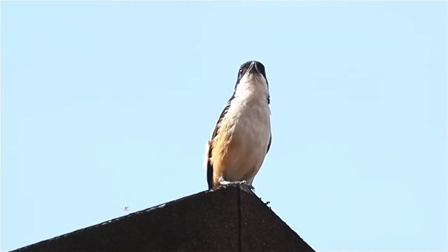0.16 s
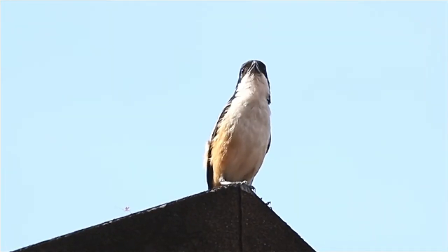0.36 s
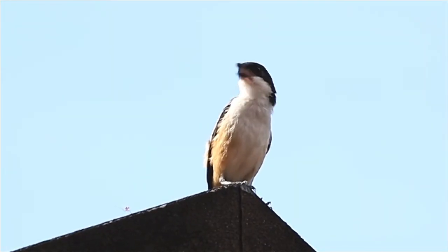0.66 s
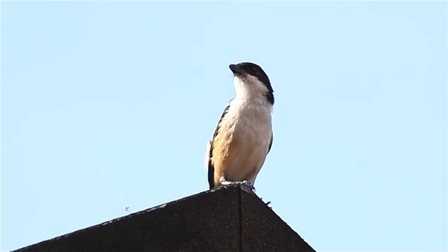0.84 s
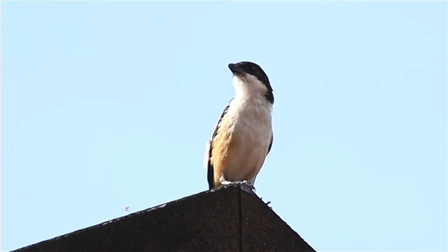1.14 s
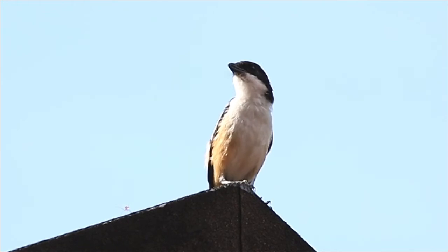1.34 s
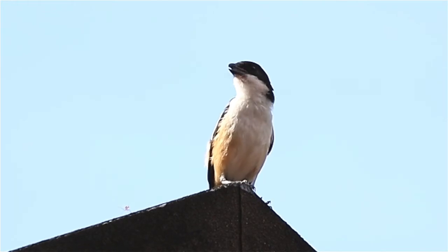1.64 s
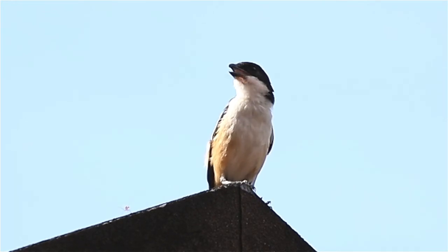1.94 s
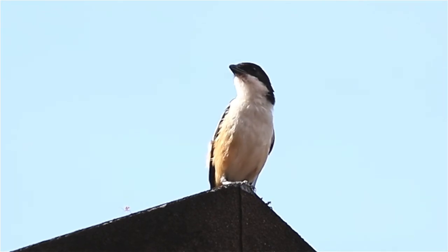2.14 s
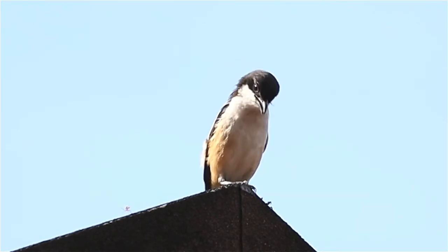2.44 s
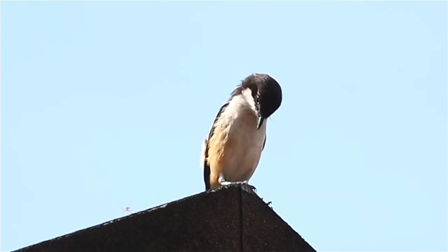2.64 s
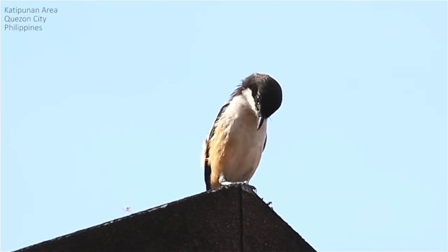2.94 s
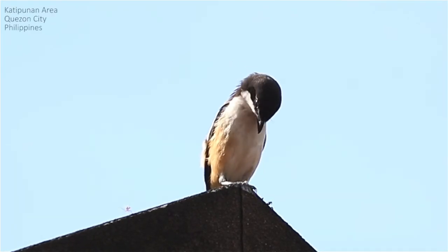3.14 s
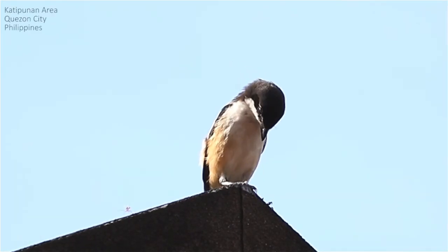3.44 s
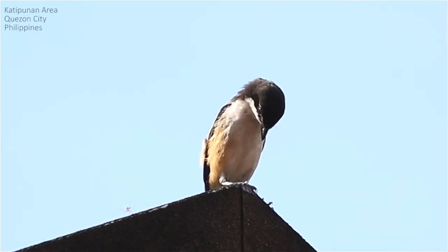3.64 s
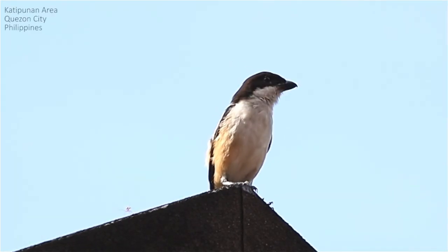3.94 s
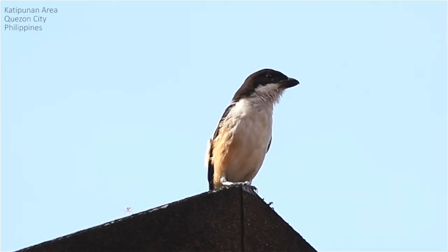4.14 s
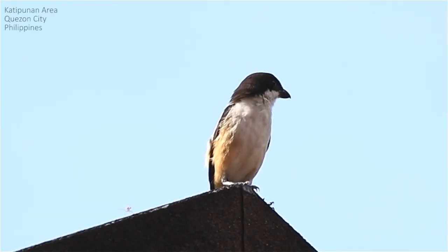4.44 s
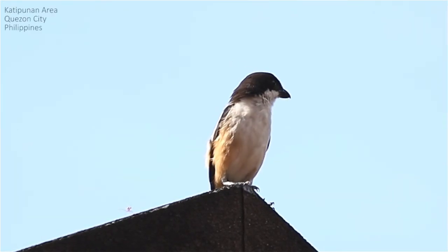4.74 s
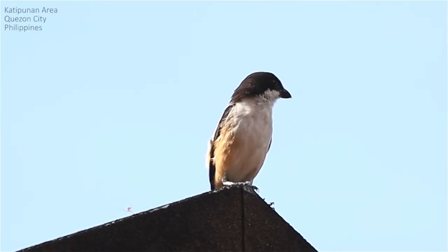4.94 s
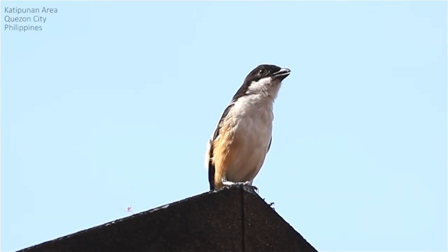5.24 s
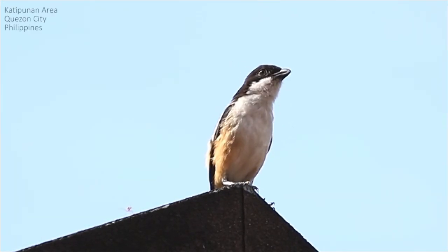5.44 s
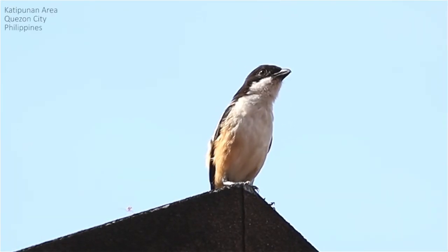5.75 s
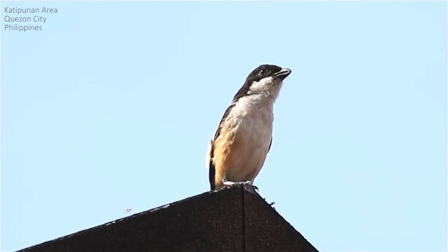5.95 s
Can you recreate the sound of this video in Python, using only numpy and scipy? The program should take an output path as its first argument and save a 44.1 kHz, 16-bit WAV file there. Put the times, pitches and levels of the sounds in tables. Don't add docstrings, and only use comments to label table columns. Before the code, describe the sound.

Outdoors among houses, distant hoarse bird chatter and small chirps lead to three loud, grating calls from one nearby bird. A quieter gap follows with one weak rasp, then other birds' brief whistles and quick falling sweeps, a faint hoarse rooster far off, and two shorter closing rasps. Soft traffic rumble, a fine insect shimmer and microphone hiss continue throughout; noise reduction makes the middle band unnaturally empty between calls.

```python
import sys
import numpy as np
from scipy import signal
from scipy.fft import rfft, irfft, next_fast_len
from scipy.io import wavfile
from scipy.ndimage import uniform_filter1d, map_coordinates

SR = 44100
rng = np.random.default_rng(int(sys.argv[2]) if len(sys.argv) > 2 else 0)


def put_to_file(sound):
    columns = np.atleast_2d(sound).T
    safe = np.clip(columns, -1, 1)
    whole_steps = np.round(safe * 32767)
    wavfile.write(sys.argv[1], SR, whole_steps.astype(np.int16))


def how_loud(loudness_db):
    steps = np.asarray(loudness_db, float) / 20
    return 10 ** steps


N = 268569
EAR_TILT = how_loud([[.6], [-.6]])


def unit(x):
    return x / np.sqrt(np.mean(np.abs(x) ** 2) + 1e-20)


def along(points, hz):
    f, v = np.transpose(points)
    return np.interp(np.log(hz + 1), np.log(f + 1), v)


def curves(rows, t):
    s, *columns = np.transpose(rows)
    return [np.interp(t, s, column) for column in columns]


def wobble(rate, count):
    knots = rng.standard_normal(int(count * rate / SR) + 4)
    return map_coordinates(knots, [np.arange(count) * rate / SR])


def add(out, start_s, x):
    part = out[..., round(start_s * SR):][..., :x.shape[-1]]
    part += x[..., :part.shape[-1]]


def tone(hz, rough, smear_hz):
    rough = np.clip(rough, 0, 1)
    fuzz = unit(wobble(smear_hz, len(hz)) + 1j * wobble(smear_hz, len(hz)))
    turn = np.exp(2j * np.pi * (np.cumsum(hz) / SR + rng.random()))
    return np.sqrt(2) * np.imag((np.sqrt(1 - rough) + np.sqrt(rough) * fuzz) * turn)


def glides(notes):
    out = np.zeros(N)
    for start_s, length_s, first_hz, last_hz, level_db, rough in notes:
        u = np.linspace(0, 1, round(length_s * SR))
        swell = np.sin(np.pi * u ** 0.7) ** 0.6 * np.clip(u * length_s / 0.004, 0, 1)
        pitch_hz = first_hz + (last_hz - first_hz) * u
        add(out, start_s, how_loud(level_db) * swell * tone(pitch_hz, rough, smear_hz=120 + 600 * rough ** 2))
    return out * EAR_TILT


def shrike():
    # start_s, swell_s, hold_s, release_s, peak_db
    efforts = [
        (-.1, 0.046, 0.022, 0.46, -37.5),
        (1.734, .045, 0.014, 0.044, -19.5),
        (1.998, .065, 0.016, .035, -19),
        (2.42, 0.044, 0.1, 0.029, -20.5),
        (3.388, 0.1133, 0.016, .07, -35.5),
        (5.582, 0.016, 0.05, 0.049, -26),
        (5.939, 0.017, 0.051, 0.048, -26.5),
    ]
    # first_hz, last_hz, cycles per flutter, roughness (0-1), swell_db
    voices = [(884, 860, 4, 0.13, 6), (853.6, 760, 4, .9, 14), (870, 810, 3, 0.76, 8.5),
              (830, 770, 3, 0.4, 7), (950, 885, 4, 0.74, 5.5), (991, 950, 4, 0.53, 3),
              (1003, 870, 4, 0.9, 6.5)]
    # low lines_db, high lines_db, top_hz, top_db
    throats = [(14, -5, 13000, -101), (-40, -3, 17000, -62), (-55, 0.5, 13000, -48),
               (-21.5, 1, 13400, -44.5), (-18, 9, 14300, -23), (-23, -17.5, 13000, -105),
               (-31, -16.5, 18000, -80)]
    # first_hz, last_hz, level_db over plain lines, strongest at (share 0-1)
    resonances = [
        [(2600, 2650, 10.5, 0.4), (4700, 4900, 1, 0)],
        [(3800, 4400, 4.5, 0.4), (4130, 6000, 11.5, .55), (4550, 4650, 6.5, 0.4)],
        [(3500, 4520, 13, 0.55), (4260, 5400, 7.5, .3)],
        [(3950, 3650, 7, 0.45), (5280, 4300, 10, 0), (5570, 3200, -2, 0.05)],
        [(3410, 3460, 14.5, 0.35), (4400, 4000, 16, 0.55), (5350, 5020, 15, 0.81)],
        [(3550, 4640, 5.5, 0.3), (4700, 5080, 12, 0.08)],
        [(4600, 4400, 9.5, 0.26), (5110, 4900, 7, 0.21)],
    ]
    # start_s, length_s, pitch_hz, level_db
    clear_partials = [(1.778, 0.053, 2524, -51), (1.787, 0.032, 2680, -48.5), (2.044, .07, 2690, -58),
                      (2.046, 0.076, 1720, -64), (2.444, .11, 3260, -38.5), (2.452, 0.1, 2538, -47.5),
                      (2.439, 0.065, 1610, -56.5), (2.487, 0.019, 4120, -28), (2.498, 0.064, 5613, -27.5),
                      (2.557, 0.042, 2964, -40.5), (3.406, 0.15, 2870, -48), (3.495, 0.079, 2764, -41),
                      (3.392, .08, 3800, -44.5), (3.399, 0.28, 5780, -52), (5.59, 0.056, 5630, -44.5),
                      (5.607, 0.045, 2490, -50), (5.612, 0.088, 2737, -48), (6.001, 0.038, 2716, -48)]
    # start_s, length_s, first_hz, last_hz, level_db
    endings = [
        (5.635, 0.068, 2946, 3070, -39.5),
        (5.65, 0.045, 3280, 3220, -39.5),
        (6.001, 0.062, 3030, 3360, -37),
    ]
    attack_s, onset_db, release_db, pan_db = 0.015, -19.5, -36.5, 3
    sag_per_s, partial_rough, ending_rough = 0.35, 0.2, 0.55
    out, top = np.zeros((2, 2, N))
    for effort, voice, throat, rings in zip(efforts, voices, throats, resonances):
        start_s, swell_s, hold_s, release_s, peak_db = effort
        first_hz, last_hz, cycles, rough, swell_db = voice
        low_db, high_db, top_hz, top_db = throat
        knots = start_s + np.cumsum([0, attack_s, swell_s, hold_s, release_s])
        t = np.arange(max(start_s, 0), knots[-1], 1 / SR)
        u = (t - start_s) / (knots[-1] - start_s)
        effort_db = np.interp(t, knots, [onset_db - swell_db, -swell_db, 0, 0, release_db])
        pitch_hz = np.linspace(first_hz, last_hz, len(t)) * (1 + 0.01141 * wobble(89.7, len(t)))
        soft_ends = np.clip(np.minimum(t - t[0], t[-1] - t) / 0.0048, 0, 1)
        shape = soft_ends * how_loud(peak_db + effort_db + np.array([[pan_db], [-pan_db]]) / 2)
        add(out, t[0], flutter_lines(pitch_hz / cycles, u, rough, low_db, high_db, rings) * shape)
        add(top, t[0], how_loud(top_db) * top_band(t, top_hz) * shape * how_loud(-0.4 * effort_db))
    strands = [(start_s, length_s, hz, hz * (1 - sag_per_s * length_s), level_db, partial_rough)
               for start_s, length_s, hz, level_db in clear_partials]
    strands += [(*row, ending_rough) for row in endings]
    return out + how_loud(2.5) * glides(strands) + chirps(), top


def flutter_lines(flutter_hz, u, rough, low_db, high_db, rings):
    low_opens_db, ring_width_hz, ring_span = 16.5, 170, 0.38
    voice = np.zeros(len(u))
    for k in range(int(2500 / flutter_hz[0]), int(6200 / flutter_hz[0]) + 1):
        hz = k * flutter_hz
        low = np.clip((3400 - hz) / 300, 0, 1)
        high = np.clip((hz - 4200) / 900, 0, 1)
        level_db = low * (low_db + low_opens_db * u - 17.5) + high * high_db
        level_db -= 40 * np.clip((hz - 5900) / 300, 0, 2)
        gain = how_loud(level_db)
        for first_hz, last_hz, ring_db, strongest in rings:
            off_centre = (hz - first_hz - (last_hz - first_hz) * u) / ring_width_hz
            off_time = (u - strongest) / ring_span
            gain = gain + how_loud(ring_db) * np.exp(-off_centre ** 2 - off_time ** 2)
        voice += gain * how_loud(3 * wobble(25, len(u)) - 16) * tone(hz, rough, smear_hz=230)
    return voice


def top_band(t, top_hz):
    ears = np.zeros((2, len(t)))
    for ear in ears:
        for ratio, fall_db_per_s in ((0.93, 250.5), (0.97, 62), (1, -4.5), (1.04, 88.5), (1.07, 149.5)):
            ear += how_loud(-fall_db_per_s * (t - t[0])) * tone(ratio * top_hz + 0 * t, 0.6, smear_hz=300)
    return ears


def chirps():
    # start_s, top_hz, spacing_hz, level_db, answer_hz
    stacks = [
        (0.487, 3950, 304, -44, 2600),
        (1.18, 3720, 214, -53, 2765),
        (1.368, 4096, 300, -49, 2806),
    ]
    rough, sag, rise = 0.35, 0.02, 0.0416
    notes = []
    for start_s, top_hz, spacing_hz, level_db, answer_hz in stacks:
        for k, line_db in enumerate((-7, 4, -1.5)):
            hz = top_hz - k * spacing_hz
            notes.append((start_s, 0.043, hz, hz * (1 - sag), level_db + line_db, rough))
        notes.append((start_s + 0.02, 0.064, answer_hz, answer_hz * (1 + rise), level_db + 3, rough))
    return glides(notes)


def neighbours():
    # start_s, length_s, pitch_hz, level_db
    whistles = [(.297, 0.05, 3310, -52), (.34, 0.062, 2660, -41.5), (.42, 0.44, 5150, -70.5),
                (.49, 0.025, 4510, -63), (.975, 0.038, 4010, -61), (1.01, 0.039, 3780, -68),
                (1.365, .03, 3040, -49), (1.3, 0.16, 5110, -68), (1.36, 0.043, 2660, -46.5),
                (2.33, 0.063, 2365, -77.5), (2.884, 0.034, 2620, -64), (2.919, 0.044, 2059, -56.5),
                (3.119, 0.243, 3990, -65), (3.77, 0.28, 4920, -59), (4.43, 0.08, 4864, -51.5),
                (5.028, 0.045, 1425, -48), (5.09, 0.031, 5800, -52), (5.19, 0.018, 3573, -35),
                (5.441, .015, 3406, -38.5)]
    # start_s, length_s, pitch_hz, level_db
    chatter = [(0, .25, 2113, -45.5), (.05, .146, 2673, -43.5), (.304, 0.3, 2240, -56),
               (2.9, 0.54, 2124, -71.5), (4.42, .3, 2125, -73.5), (5.66, 0.5, 2074, -69),
               (.7, 0.1, 1900, -58.5), (.708, 0.069, 2200, -57), (.788, 0.04, 1684, -51.5),
               (.935, 0.052, 5350, -50.5), (.94, 0.028, 5200, -53), (4.625, 0.047, 5350, -53.5),
               (4.69, 0.036, 5230, -51.5), (4.726, 0.21, 2600, -63), (4.769, 0.26, 2252, -60)]
    # start_s, length_s, first_hz, last_hz, level_db
    sweeps = [
        (4.193, 0.034, 4600, 4180, -44),
        (4.198, 0.0347, 3984, 3500, -44.5),
        (5.123, 0.034, 5030, 4130, -45.5),
        (5.347, 0.084, 5830, 4700, -42),
        (5.396, .024, 4940, 3960, -34),
    ]
    notes = [(*row, 0.45) for row in sweeps]
    for rows, fall, rough in ((whistles, 0, 0.25), (chatter, 0.0317, 0.85)):
        notes += [(start_s, length_s, hz, hz * (1 - fall), level_db, rough)
                  for start_s, length_s, hz, level_db in rows]
    return glides(notes)


def cock():
    # start_s, pitch_hz, level_db
    course = [
        (4.42, 759, -66),
        (4.48, 787, -57),
        (4.7, 817, -66),
        (4.78, 922, -60.5),
        (5.0, 950, -55.5),
        (5.3, 901.4, -53.5),
        (5.55, 870, -58.5),
        (5.65, 801, -57.5),
        (6.09, 741.5, -60.5),
    ]
    # multiple of the pitch, level_db
    harmonics = [
        (1, 1.5),
        (2, 5.5),
        (3, -30),
    ]
    t = np.arange(course[0][0], N / SR, 1 / SR)
    pitch_hz, level_db = curves(course, t)
    out = np.zeros((2, N))
    for multiple, part_db in harmonics:
        part = tone(multiple * pitch_hz, 1.0, smear_hz=170 * multiple)
        add(out, t[0], how_loud(level_db + part_db) * part[None])
    return out


def walls(x):
    # pitch_hz, t60_s
    decay = [(1000, 1.5), (3000, 0.5), (6000, 0.92)]
    hz, t, z = signal.stft(rng.standard_normal((2, SR)), SR, nperseg=256)
    fall_db = -60 * t / along(decay, hz)[:, None] - 9.6 * np.clip(t / 0.094, 0, 1)
    tail = signal.istft(z * how_loud(fall_db), SR, nperseg=256)[1]
    delayed = np.pad(x.mean(0), (500, 0))[None]
    return signal.fftconvolve(delayed, tail / np.linalg.norm(tail[0]), axes=1)[:, :N]


def background():
    # pitch_hz, level_db per Hz
    traffic = [(20, -42.5), (65, -2), (124, 0), (229, -5.5), (452, -13.5), (603, -17.5), (668, -7),
               (929, -14), (1400, -21.5), (2070, -36.5), (2600, -41), (3700, -44), (4400, -48.5),
               (6500, -90.5)]
    # time_s, level_db
    traffic_db = [(0, -42.5), (6.09, -43.5)]
    # centre_hz, width_hz, level_db
    insect_bands = [(5515, 166, -11), (5987, 20, -6.5)]
    # time_s, level_db
    insect_db = [(0, -53.5), (.4, -60), (1.27, -56.5), (2.6, -58), (3.3, -63.5), (4.1, -63), (4.63, -57.5),
                 (5.3, -62), (6.09, -56)]
    # pitch_hz, level_db per Hz
    hiss_band = [(5700, -55.5), (6200, -9.5), (7000, -5), (8500, -6), (9200, -16.5), (10300, -13),
                 (10800, -16.5), (11000, -65.5)]

    def chorus(hz):
        return sum(how_loud(db) * np.exp(-((hz - centre) / width) ** 2) for centre, width, db in insect_bands)

    t = np.arange(N) / SR
    hum = patches(rush(lambda hz: how_loud(along(traffic, hz))), patchy_db=3.5)
    town = how_loud(curves(traffic_db, t)[0] + 1.5 * wobble(2.7146, N)) * hum
    insects = how_loud(curves(insect_db, t)[0] + 3.3 * wobble(8.4, N)) * rush(chorus)
    hiss = how_loud(-62.0) * rush(lambda hz: how_loud(along(hiss_band, hz)))
    return (town + insects + hiss) * EAR_TILT


def rush(gain):
    # pitch_hz, left-right likeness (0-1)
    likeness = [(30, 0.99), (100, 0.99), (300, 0.97), (700, 0.68), (1500, 0.38), (5000, 0.059),
                (8000, 0.21)]
    m = next_fast_len(N)
    hz = np.fft.rfftfreq(m, 1 / SR)
    turn = np.arccos(np.clip(along(likeness, hz), -1, 1)) / 2
    spectrum = rfft(rng.standard_normal((2, m))) * gain(hz)
    mid, side = irfft(spectrum * [np.cos(turn), np.sin(turn)], m)[:, :N]
    return unit(np.array([mid + side, mid - side]))


def patches(x, patchy_db):
    z = signal.stft(x, nperseg=512)[2]
    field = uniform_filter1d(rng.standard_normal(z.shape[1:]), size=2, axis=0)
    field = uniform_filter1d(field, size=14, axis=1)
    depth = np.clip(np.arange(z.shape[1]) / 18 - 0.6, 0, 1)[:, None]
    return signal.istft(z * how_loud(patchy_db * depth * unit(field)), nperseg=512)[1][:, :N]


def scene():
    near, top = shrike()
    far = neighbours() + cock()
    echoes = how_loud(-0.5) * walls(near) + how_loud(2.5) * walls(far)
    return near + top + far + echoes + background()


def band_limit(x):
    return signal.sosfilt(signal.butter(12, 15500, fs=SR, output="sos"), x)


def record(dry):
    # pitch_hz, level_db per bin
    gate = [(1300, -140), (2000, -80.5), (2600, -84.5), (3900, -89), (4300, -83), (5000, -105), (5400, -76),
            (6000, -140)]
    # pitch_hz, level_db against the loudest bin
    mask = [(1800, -89), (2400, -42.5), (5800, -48), (6300, -40.5), (7500, -47.5), (10000, -65)]
    hz, t, z = signal.stft(dry, SR, nperseg=1024)
    power = uniform_filter1d(np.mean(np.abs(z) ** 2, 0), size=4, axis=0)
    power = uniform_filter1d(power, size=4, axis=1)
    level_db = 10 * np.log10(np.abs(power) + 1e-20)
    loudest_db = level_db[hz > 2000].max(0)
    masked_db = loudest_db + (along(mask, hz) - 60 * (hz > 11500))[:, None]
    shut_db = np.maximum(along(gate, hz)[:, None], masked_db)
    closing = how_loud(np.clip(3 * (level_db - shut_db), -26, 0))
    clean = signal.istft(z * closing, SR, nperseg=1024)[1][:, :N]
    return band_limit(clean)


dry = scene()
out = record(dry)
put_to_file(out)
```